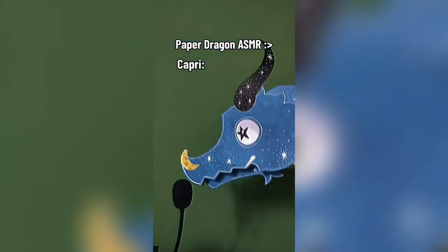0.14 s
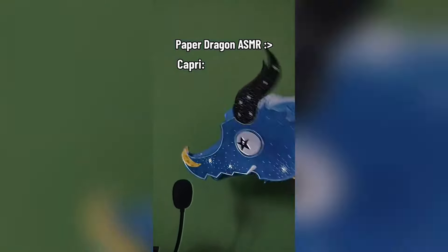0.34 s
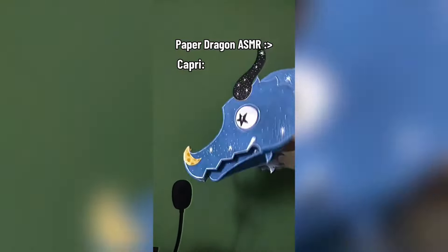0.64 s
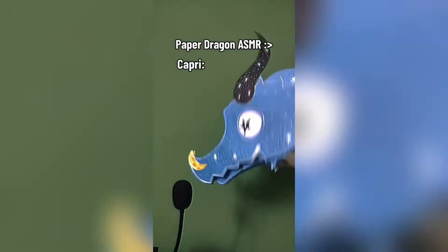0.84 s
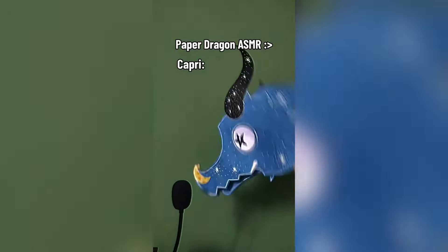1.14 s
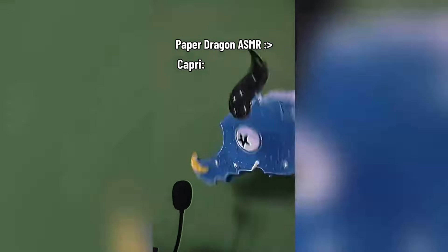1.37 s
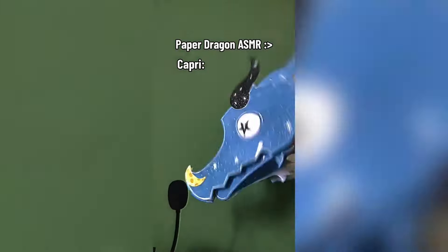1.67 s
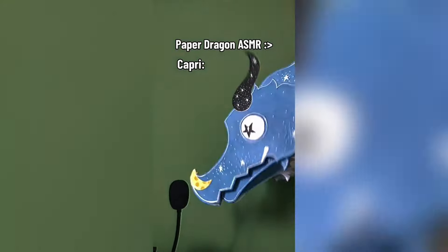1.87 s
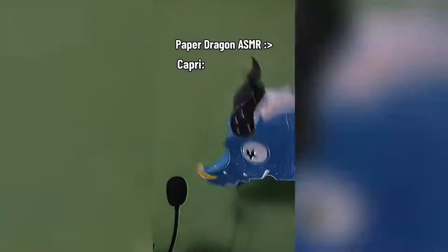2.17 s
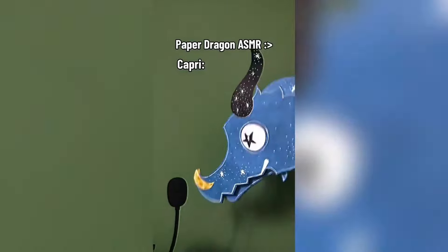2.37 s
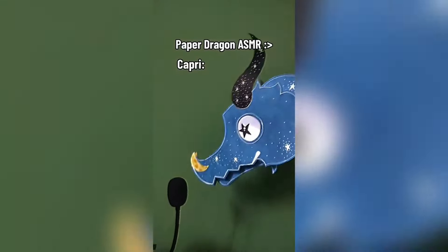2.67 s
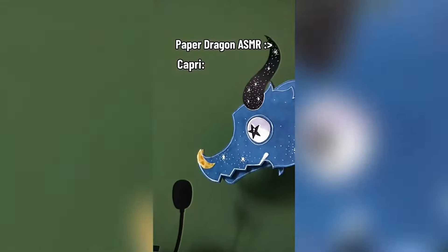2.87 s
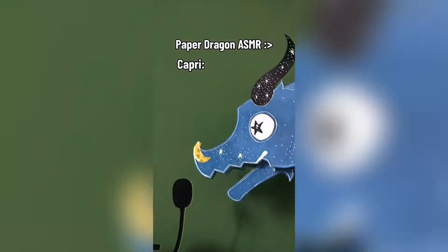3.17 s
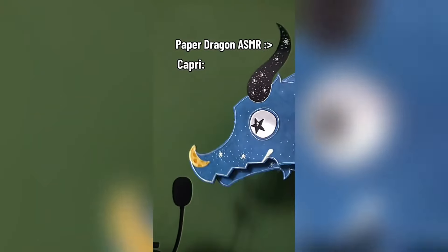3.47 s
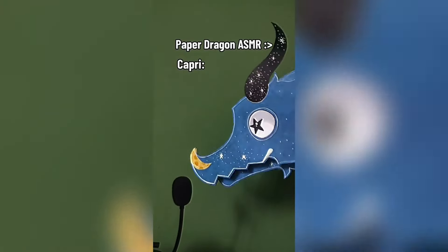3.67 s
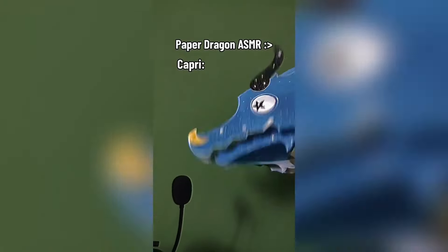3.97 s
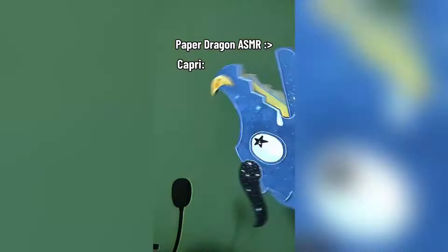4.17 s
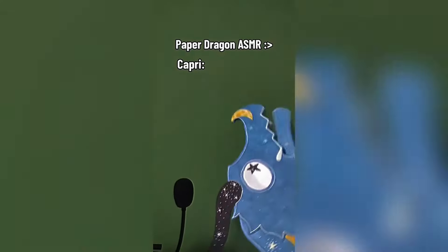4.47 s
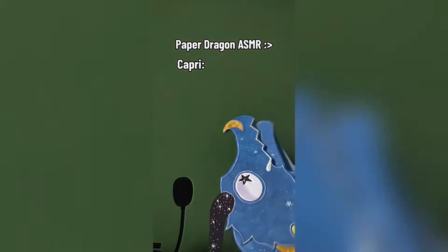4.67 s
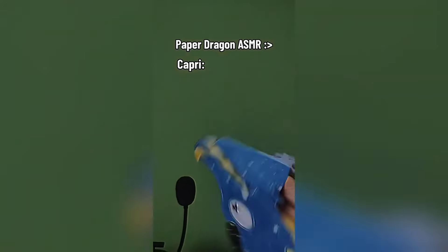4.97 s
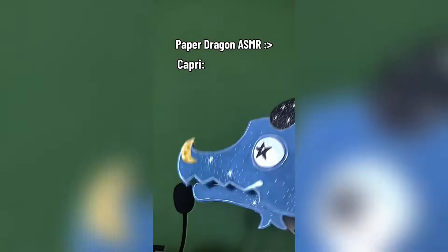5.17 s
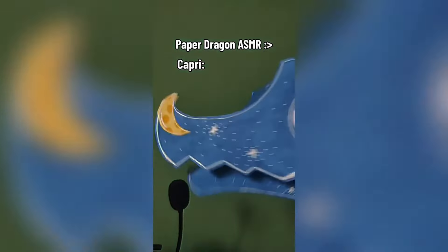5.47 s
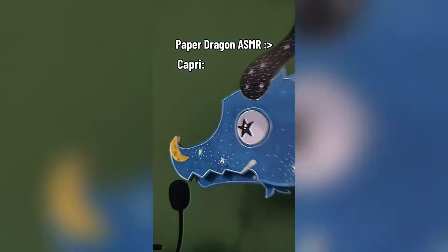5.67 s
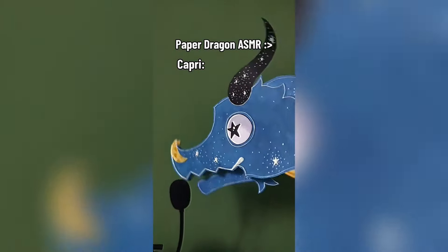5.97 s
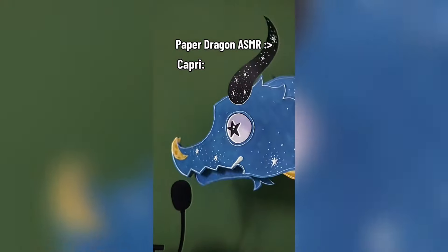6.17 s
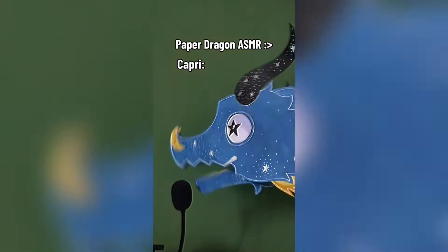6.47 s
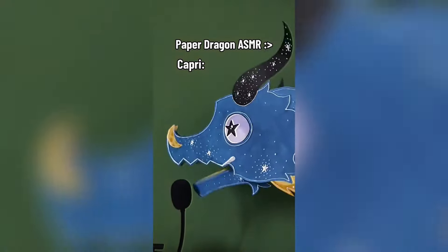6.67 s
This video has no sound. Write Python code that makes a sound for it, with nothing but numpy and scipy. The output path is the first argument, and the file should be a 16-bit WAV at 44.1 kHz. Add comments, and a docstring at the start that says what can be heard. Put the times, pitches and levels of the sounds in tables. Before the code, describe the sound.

A folded paper puppet is handled very close to a foam-covered microphone in a quiet room. From the start, creases give small, dry, irregular clicks and crackles over faint paper slides and a soft hand rumble, with low puffs of air as the head swings. At about 1.6 seconds it hits the foam with a loud, crunchy thud and a short low wobble. Stronger air puffs and light taps follow until about 2.7. Crisp, hollow snaps stand out at 3.3, 3.6 and 3.8 seconds, then lighter ticks continue to 5. Around 5.2 seconds comes a quick cluster of loud knocks, foam crunches and a gust, leaving the flexible stand briefly wobbling and faintly humming. More crackles and soft puffs lead to three sharp, hollow jaw snaps at about 6.2, 6.4 and 6.6 seconds, each with a very short room tail.

```python
"""A folded paper puppet cracks, knocks and rustles right up close, nodding and snapping its jaws in a
quiet room. Creases let go and set the sheet and the hollow head ringing; paper slides over paper while
the hand inside rumbles. Swings puff air at a foam-covered microphone. Now and then the head bumps the
foam with a crunch and a thud, and the gooseneck wobbles and hums."""
import sys
import numpy as np
from scipy import signal
from scipy.fft import rfft, irfft
from scipy.io import wavfile

SR = 44100
rng = np.random.default_rng(int(sys.argv[2]) if len(sys.argv) > 2 else 0)


def pcm_store(signal):
    """Save signal as 16-bit PCM."""
    levels = np.round(np.clip(np.atleast_2d(signal), -1, 1) * 32767)
    wavfile.write(sys.argv[1], SR, levels.astype(np.int16).T)


N = 301644

# The bright colour of breaking creases. Each row: centre in Hz, width in Hz, gain in dB.
CREASE_BANDS = [(2490, 2270, 1), (5030, 5370, 3), (8820, 12100, 0.5), (14190, 5070, -0.5)]
# Paper touching the foam. Each row: start in seconds, length in ms, level in dB, grit in dB relative to it.
FOAM_TOUCHES = [(1.559, 31.7, -18.5, -20), (5.172, 54, -30.5, -10.5), (5.219, 45.5, -31, -2),
                (5.261, 20, -20.5, -15), (5.977, 19, -27.5, -38), (6.007, 19, -37, -15),
                (6.054, 19, -39, -31), (6.071, 25.4, -30.5, -21), (6.213, 26, -35, -26),
                (6.442, 11, -32, -9), (6.632, 6.7, -43, -20)]


def snap_columns():
    """The snaps and the colour of each crack: dull when it has much body, bright when it is bare."""
    # Each row: start in seconds, crack peak in dB, head knock in dB, sheet ring in dB, ring centre in Hz.
    snap_cues = [(0.189, -40.5, -83, -80, 1150), (0.23, -37.5, -67, -67, 1170),
                 (0.344, -30.5, -74, -54.5, 684), (0.3796, -28, -56, -63, 552), (0.418, -27, -66, -55, 565),
                 (0.4417, -60, -47.5, -44.5, 708), (0.5202, -16, -59, -42, 780),
                 (0.582, -23, -67, -28, 1250), (0.606, -41, -76, -44, 719), (0.7452, -16, -43.5, -36, 592),
                 (0.861, -52, -42, -51, 1100), (1.0519, -52, -36.5, -38.5, 1070),
                 (1.1024, -17.5, -48, -37, 1560), (1.127, -43, -36, -48, 719),
                 (1.1733, -34, -42.5, -44, 720), (1.2377, -51, -34, -35, 1180),
                 (1.5609, -29, -22.5, -16, 940), (1.5734, -16, -15.5, -18, 870),
                 (1.7658, -27, -59, -72, 552), (1.777, -26, -59, -60, 552), (1.8034, -44, -32, -41, 556),
                 (2.0215, -28, -36, -51, 570), (2.0652, -31.5, -28.5, -41.5, 552),
                 (2.2482, -19.5, -28, -36, 554), (2.458, -38, -42.5, -65, 576),
                 (2.4824, -35, -35.5, -42.5, 552), (2.7026, -36, -52, -64, 573),
                 (2.757, -33, -63, -61, 713), (2.7825, -22.5, -62, -61, 1410),
                 (2.831, -34.5, -66, -48, 1380), (2.8835, -28.5, -79, -59, 1900),
                 (3.1517, -20, -52.5, -36.5, 1420), (3.3086, -36, -40, -49, 635),
                 (3.3408, -12, -26.5, -20.5, 608), (3.412, -33.5, -48.5, -42.5, 734),
                 (3.5634, -16, -30, -24.5, 780), (3.5936, -38, -46.5, -43, 740),
                 (3.7475, -48, -40, -40, 670), (3.7611, -13.5, -23.5, -22, 795),
                 (3.9889, -72, -80, -45, 810), (4.1856, -55, -54, -44, 1210),
                 (4.2056, -23.5, -57, -46.5, 1450), (4.4354, -27.5, -41, -40, 1210),
                 (4.6219, -24.5, -39.5, -35.5, 1560), (4.8131, -27.5, -46, -41.5, 1600),
                 (4.9908, -25.5, -38, -37.5, 1130), (5.0925, -30.5, -64, -63, 1550),
                 (5.1243, -27, -63, -52, 1750), (5.1719, -21, -16.5, -17.5, 900),
                 (5.2234, -19, -20, -18.5, 1430), (5.243, -16, -15, -14.5, 770),
                 (5.2639, -42, -17.5, -29, 1000), (5.28, -11, -16, -13.5, 840),
                 (5.3792, -22, -47, -46.5, 563), (5.46, -36, -65, -70, 568), (5.4683, -32.5, -68, -69, 568),
                 (5.5057, -13, -33.5, -25.5, 1070), (5.6624, -39, -74, -65, 552),
                 (5.681, -31, -70, -70, 1260), (5.7, -32, -61, -64, 641),
                 (5.7797, -13.5, -35.5, -35.5, 750), (5.8788, -30, -50.5, -50, 1800),
                 (5.9808, -39, -28, -28, 814), (6.109, -20.5, -42, -42.5, 939), (6.118, -31, -63, -55, 764),
                 (6.167, -26.5, -58, -53, 716), (6.188, -29, -58, -62, 552), (6.1985, -35, -33, -31, 810),
                 (6.2106, -6, -13.5, -23, 593), (6.3057, -24.5, -52, -47.5, 759),
                 (6.3595, -32.5, -60, -55, 782), (6.394, -31.5, -45, -47, 697),
                 (6.4243, -35, -40, -27.5, 740), (6.4406, -6.5, -14.5, -27, 620),
                 (6.51, -26.5, -53, -45, 1830), (6.525, -32.5, -53, -49.5, 676),
                 (6.5842, -26.5, -66, -56, 824), (6.5926, -31, -54, -58, 581),
                 (6.63, -7.5, -12, -20.5, 716)]
    start, crack_db, knock_db, ring_db, ring_hz = np.transpose(snap_cues)[..., None]
    bare_db = np.maximum(crack_db - np.maximum(knock_db, ring_db), 0)
    crack_hz = 2440 * 2 ** (0.05 * bare_db)  # an octave up per 20 dB of bareness
    return start, crack_db, knock_db, ring_db, ring_hz, crack_hz


def snaps():
    """A crease lets go in a splinter of noise; the sheet and the hollow head ring briefly."""
    # Air and walls of the head. Each row: pitch in Hz, level in dB, decay (t60) in seconds.
    head_modes = [(118.5, 8, 0.025), (185.5, 3.5, 0.042), (273, 6.5, 0.034), (304, 6, 0.017),
                  (343, 0, 0.037), (448, 6.5, 0.028)]
    # The flexing sheet. Each row: pitch in Hz, level in dB, decay (t60) in seconds.
    sheet_modes = [(620, 0, .016), (800, 0, .016), (1000, 0, .014), (1250, -2, .012), (1600, -3, .011),
                   (2000, -5, .01)]
    start, crack_db, knock_db, ring_db, ring_hz, crack_hz = snap_columns()
    t = np.arange(4096) / SR
    envelope = (1 - np.exp(-t / 0.0011)) * (fade(t, 0.0054) + undb(-23) * fade(t, 0.03))
    burst = rng.standard_normal((len(start), len(t))) * envelope
    thin = signal.butter(2, 900, "high", fs=SR)  # a crease is too small to radiate lows
    crack = signal.lfilter(*thin, colour(burst, CREASE_BANDS, crack_hz, slope_db=3))
    crack /= np.abs(crack).max(axis=1, keepdims=True)
    knock_hz = np.full_like(start, 208)
    knock = ring(head_modes, knock_hz, slope_db=-2.5, detune=0.11, scatter_db=2.5, rise_s=0.0012)
    rise_s = 0.00073 * 2 ** np.clip((ring_db - crack_db) / 5, 0, 3)  # softer attack under a weak crack
    sheet = ring(sheet_modes, ring_hz, slope_db=13, detune=0.05, scatter_db=2, rise_s=rise_s)
    return lay(start[:, 0], undb(crack_db) * crack + undb(knock_db) * knock + undb(ring_db) * sheet)


def air_puffs():
    """Each swing sucks the pressure down in a smooth dip that buffets a little."""
    # Each row: time in seconds, depth in dB, width in ms.
    puffs = [(0.338, -19.5, 40), (0.534, -18, 21), (0.584, -13, 29), (0.714, -25.5, 20), (0.776, -13, 48),
             (0.905, -19, 24), (0.955, -9.5, 34), (1.126, -10, 55), (1.316, -16, 39), (1.751, -2, 33.6),
             (1.829, -2.5, 23), (1.984, -21, 28), (2.041, -3, 19.5), (2.162, -23.5, 41), (2.246, -10.5, 26),
             (2.473, -16, 51), (2.688, -18, 43), (4.176, -23, 150), (5.159, -15.5, 58), (5.208, -3, 33),
             (5.504, -23.5, 63), (5.636, -24, 66), (5.751, -21.5, 58), (5.855, -24.5, 50),
             (6.054, -14.5, 94), (6.212, -10.5, 53), (6.319, -15.5, 71), (6.435, -15, 42)]
    time, depth_db, width_ms = np.transpose(puffs)[..., None]
    buffet = unit(band(band(rng.standard_normal(N), 49, 47), 49, 47))
    return -humps(time + 0.0069, undb(depth_db), width_ms) * (1 + 0.038 * buffet)


def gooseneck():
    """A bump swings the capsule once, then the neck wobbles and hums on."""
    # The head hits the foam. Each row: start in seconds, then thud, wobble and hum levels in dB.
    bumps = [(1.56, 4.5, -7.5, -55), (5.172, -21, -10, -28), (5.282, -7, -20.5, -35.5),
             (5.987, -43, -13.5, -37)]
    # Thud, wobble and hum of the neck. Each row: pitch in Hz, decay (t60) in seconds.
    neck_modes = [(27, 0.15), (38.5, 1.025), (296, 0.7)]
    t = np.arange(SR) / SR
    start, *levels_db = np.transpose(bumps)[..., None]
    attack = 1 - np.exp(-t / 0.0043)
    swings = (-fade(t, t60) * np.sin(2 * np.pi * hz * t) * attack for hz, t60 in neck_modes)
    return lay(start[:, 0], sum(undb(db) * swing for db, swing in zip(levels_db, swings)))


def foam_contact(gains):
    """Envelope of the moments when paper touches the foam: quick on, quick off."""
    start, length_ms = np.transpose(FOAM_TOUCHES)[:2, :, None]
    t = np.arange(4096) / SR
    attack, release = t / 0.004, (length_ms / 1000 + 0.0059 - t) / 0.017
    return lay(start[:, 0], gains * np.clip(np.minimum(attack, release), 0, 1))


def foam_crunches():
    """Dense stick-slip straight into the capsule: thick lows and mids, some grit on top."""
    # The colour of rubbed foam. Each row: centre in Hz, width in Hz, gain in dB.
    foam_bands = [(117.5, 250, -4.5), (310, 80, 4), (840, 270, 0), (1480, 1260, -6), (2840, 540, -8.5)]
    db, grit_db = np.transpose(FOAM_TOUCHES)[2:, :, None]
    slips = grains(rate=900, spread_db=7, t60=0.012)
    body = foam_contact(undb(db)) * unit(colour(slips, foam_bands))
    grit = foam_contact(undb(db + grit_db)) * unit(colour(slips, CREASE_BANDS))
    return body + grit


def swishes():
    """One sheet slides briefly over another with a grainy hiss."""
    # Each row: middle in seconds, length in ms, level in dB.
    slides = [(.385, 60, -51), (0.533, 26, -45.5), (.635, 20, -51), (0.739, 7.7, -37), (.79, 85, -48),
              (0.926, 9.9, -48), (1.033, 15, -46), (1.14, 110, -51.5), (1.248, 16, -47.5),
              (1.655, 26, -49.5), (1.685, 26, -46), (1.818, 22, -48.5), (1.892, 17, -48),
              (2.036, 24, -39.5), (2.098, 23.7, -34.5), (2.145, 35, -47.5), (2.246, 28, -41),
              (2.307, 43, -42.5), (2.372, 29, -48), (2.53, 26.5, -39.5), (2.578, 28, -47), (3.231, 47, -49),
              (3.819, 28, -47), (4.25, 68, -55.5), (6.175, 14, -48), (6.255, 11, -44), (6.397, 8.9, -48),
              (6.585, 41, -54.5)]
    # The colour of sliding paper. Each row: centre in Hz, width in Hz, gain in dB.
    slide_bands = [(1170, 1350, -2.5), (3020, 1500, -0.5), (4890, 1430, 1), (9100, 8200, -12.5)]
    middle, length_ms, db = np.transpose(slides)[..., None]
    hiss = unit(colour(grains(rate=1200, spread_db=3.5, t60=0.03), slide_bands))
    return humps(middle, undb(db), length_ms) * hiss


def handling():
    """Fibres tick and crinkle in the treble, surfaces rub in the mids, the hand inside rumbles."""
    # Level curves. Each row: time in seconds, then crinkle, rub, hand rumble and fibre ticks in dB.
    faders = [(0.0, -65, -62, -69, -80), (0.3, -70, -70, -65.5, -66), (0.57, -55.5, -62, -49, -61),
              (1.1, -56, -65.5, -52, -66), (1.54, -61.5, -64, -49, -77), (1.77, -56.5, -61.5, -48.5, -68),
              (2.46, -61, -63, -46.5, -68), (2.7, -59, -61.5, -54, -62), (2.89, -68, -66.5, -68, -78),
              (3.18, -73, -67, -60, -74), (3.33, -63, -59, -60, -73), (3.62, -64, -59, -58.5, -71),
              (4.21, -63.5, -63.5, -67, -67.5), (4.76, -67, -65.5, -59, -76),
              (5.05, -65, -58.5, -59.5, -74), (5.24, -77, -71, -45, -70), (5.49, -75, -67.5, -60.5, -67),
              (5.77, -65, -64, -62, -61), (6.1, -63, -61, -49, -61), (6.42, -61.5, -67, -55, -61),
              (6.84, -64.5, -63, -55, -66)]
    # The colour of rubbing surfaces. Each row: centre in Hz, width in Hz, gain in dB.
    rub_bands = [(505, 150, 13), (1010, 1380, 16), (1730, 1900, -3)]
    times, *curves = np.transpose(faders)
    crinkle_db, rub_db, rumble_db, tick_db = (np.interp(np.arange(N) / SR, times, db) for db in curves)
    slips = grains(rate=350, spread_db=10, t60=0.025)
    ticks = band(grains(rate=60, spread_db=6, t60=0.0054), 13400, 15000)
    crinkle = colour(slips + 0.45 * rng.standard_normal(N), CREASE_BANDS, 4500, slope_db=3)
    rub = colour(0.5 * slips + grains(rate=200, spread_db=6, t60=0.05), rub_bands)
    rumble = band(band(grains(rate=68, spread_db=7, t60=0.1), 58, 194), 73, 620)
    sway = band(band(rng.standard_normal(N), 24, 25), 24, 25)  # air stirred by the arm
    sway_gain = undb(rumble_db + 6) + undb(-55)  # rides above the rumble, never quite still
    lows = undb(rumble_db) * unit(rumble) + sway_gain * unit(sway)
    return undb(crinkle_db) * unit(crinkle) + undb(tick_db) * unit(ticks) + undb(rub_db) * unit(rub) + lows


def snap_tails():
    """After a snap the sheet rustles as it settles and the walls return a tail tinted by its ring."""
    # The room's reverb. Each row: centre in Hz, width in Hz, level in dB, decay (t60) in seconds.
    room_bands = [(500, 350, -27, 0.3), (780, 330, -22, 0.23), (1094, 440, -25.5, 0.33),
                  (1403, 430, -23.5, 0.28), (1900, 3300, -27.5, 0.34)]
    start, crack_db, _, ring_db, ring_hz, crack_hz = snap_columns()
    t = np.arange(SR // 3) / SR
    noise = rng.standard_normal((len(start), len(t)))
    reverb = 0
    for hz, width, db, t60 in room_bands:
        gain = undb(db + favour(hz, np.maximum(ring_hz, 950), slope_db=15))
        reverb += gain * fade(t, t60) * unit(band(band(noise, hz, width), hz, width))
    settle = undb(-42) * fade(t, 0.31) * unit(colour(noise[:, ::-1], CREASE_BANDS, crack_hz, slope_db=1))
    # Taps on the foam are loud only at the capsule and hardly reach the walls.
    on_foam = foam_contact(1)[((start + 0.002) * SR).astype(int)] > 0
    swell = (1 - np.exp(-(t / 0.012) ** 2)) * np.where(on_foam, undb(-30), 1)
    # The loudest snaps are the nearest ones, so their tails grow less than they do.
    return lay(start[:, 0], swell * (undb(0.59 * ring_db) * reverb + undb(0.51 * crack_db) * settle))


def room_tone():
    """Steady room tone and microphone hiss."""
    # Each row: frequency in Hz, relative noise density in dB.
    tone_curve = [(29, -36), (50, -11), (507, -18), (927, -18), (997, -3), (1430, 1.5), (2380, -35),
                  (3100, -14.5), (16000, -24)]
    hz, db = np.transpose(tone_curve)
    bin_hz = np.maximum(np.arange(N // 2 + 1) * SR / N, 1)
    shape = undb(np.interp(np.log(bin_hz), np.log(hz), db))
    return undb(-70.5) * unit(irfft(rfft(rng.standard_normal(N)) * shape, N))


def ring(modes, centre_hz, slope_db, detune, scatter_db, rise_s):
    """A set of modes, bent a little differently at each blow; rms 1 over the first 10 ms."""
    t, tone = np.arange(4096) / SR, 0
    for hz, db, t60 in modes:
        bend, scatter = rng.standard_normal((len(centre_hz), 2)).T[..., None]
        gain = undb(db + scatter_db * scatter + favour(hz, centre_hz, slope_db))
        tone -= gain * fade(t, t60) * np.sin(2 * np.pi * hz * np.exp(detune * bend) * t)
    tone *= 1 - np.exp(-t / rise_s)
    return tone / np.sqrt(np.mean(tone[:, :SR // 100] ** 2, axis=1, keepdims=True))


def grains(rate, spread_db, t60):
    """Tiny slips at random moments, most faint and a few strong, each a short puff of noise."""
    kicks = (rng.random(N) < rate / SR) * undb(spread_db * np.minimum(rng.exponential(size=N), 3))
    envelope = signal.lfilter([1], [1, -fade(1 / SR, t60)], kicks)
    return unit(envelope * rng.standard_normal(N))


def humps(middle_s, gains, width_ms):
    """Smooth swells of the given half-height width."""
    t = np.arange(-8192, 8192) / SR
    return lay(middle_s[:, 0] + t[0], gains * np.exp(-4 * np.log(2) * (1000 * t / width_ms) ** 2))


def colour(x, bands, centre_hz=None, slope_db=0):
    """Sum of resonances in alternating polarity; with a centre, those near it stand out."""
    tilt = lambda hz: 0 if centre_hz is None else favour(hz, centre_hz, slope_db)
    return sum((-1) ** k * undb(db + tilt(hz)) * band(x, hz, w) for k, (hz, w, db) in enumerate(bands))


def favour(hz, centre_hz, slope_db):
    """Gain in dB that drops by slope_db per octave away from the centre."""
    return -slope_db * np.abs(np.log2(hz / centre_hz))


def band(x, hz, width):
    """One resonance, gain 1 at its centre."""
    return signal.lfilter(*signal.iirpeak(hz, hz / width, fs=SR), x)


def lay(times, sounds):
    """Mix short sounds into one track."""
    track = np.zeros(N + sounds.shape[1])
    for start, sound in zip(times, sounds):
        track[int(start * SR):int(start * SR) + len(sound)] += sound
    return track[:N]


def fade(t, t60):
    """Decay by 60 dB in t60 seconds."""
    return np.exp(-np.log(1000) * t / t60)


def unit(x):
    """Scale to rms 1."""
    return x / np.sqrt(np.mean(x ** 2))


def undb(db):
    """Decibels to gain."""
    return 10 ** (np.asarray(db) / 20)


def scene():
    """Paper and its tails, moving air, the microphone arm and the room, in mono."""
    paper = snaps() + snap_tails() + swishes() + foam_crunches() + handling()
    return (paper + air_puffs() + gooseneck() + room_tone())[None]


def record(dry):
    """The capsule leaks slow pressure, so dips rebound; peaks are rounded and the top is cut."""
    leaked = signal.sosfilt(signal.butter(2, 3.5, "high", fs=SR, output="sos"), dry)
    rounded = leaked / (1 + np.abs(leaked) ** 6) ** (1 / 6)
    return signal.sosfilt(signal.ellip(8, 0.2, 70, 16300, fs=SR, output="sos"), rounded)


dry = scene()
out = record(dry)
pcm_store(out)
```